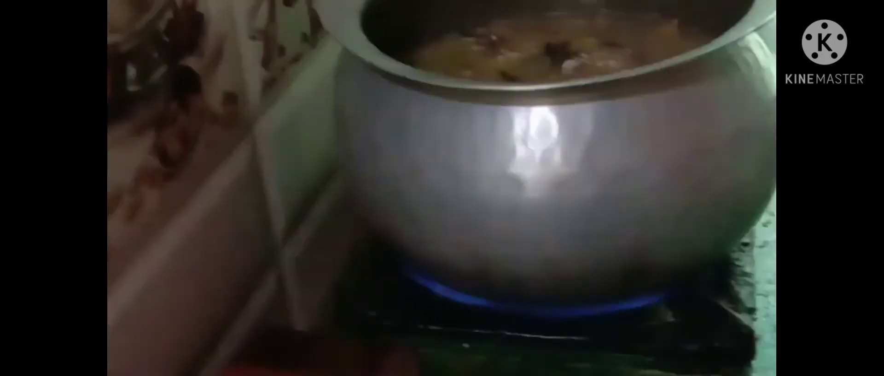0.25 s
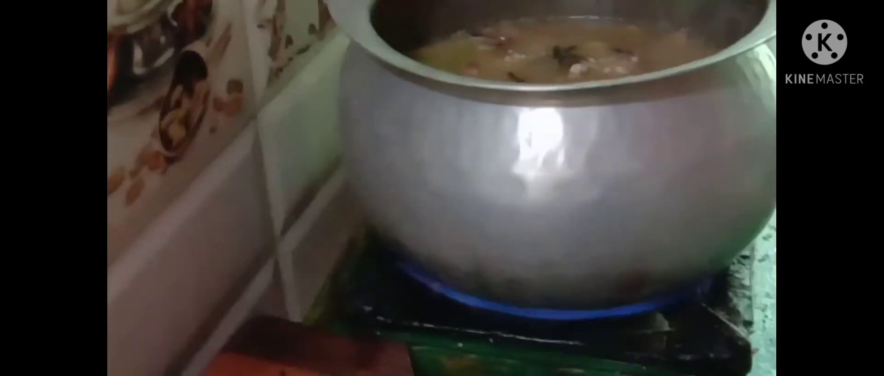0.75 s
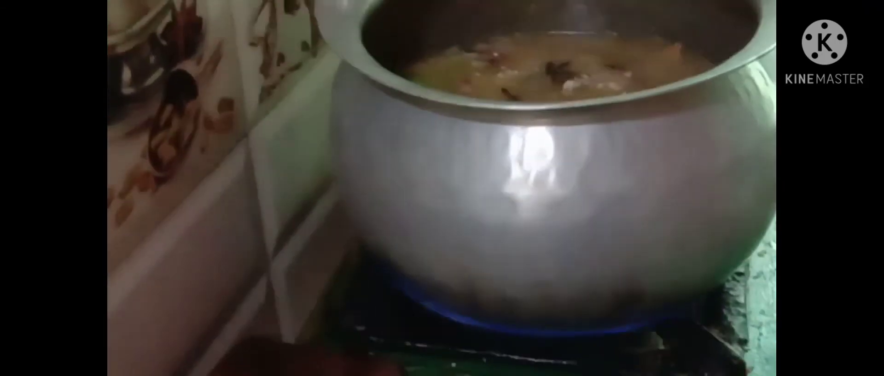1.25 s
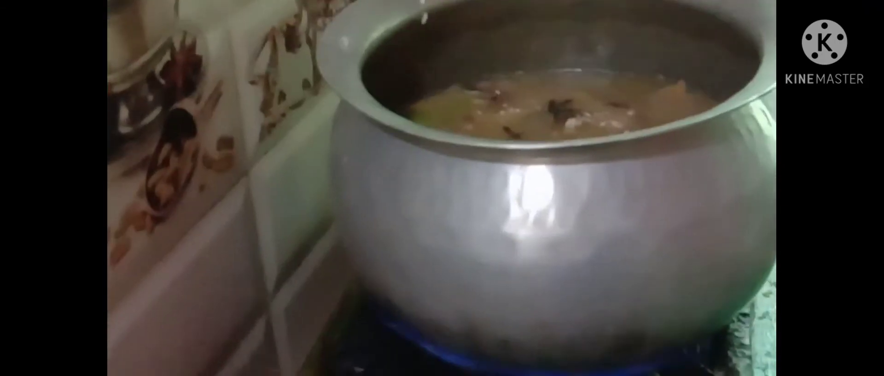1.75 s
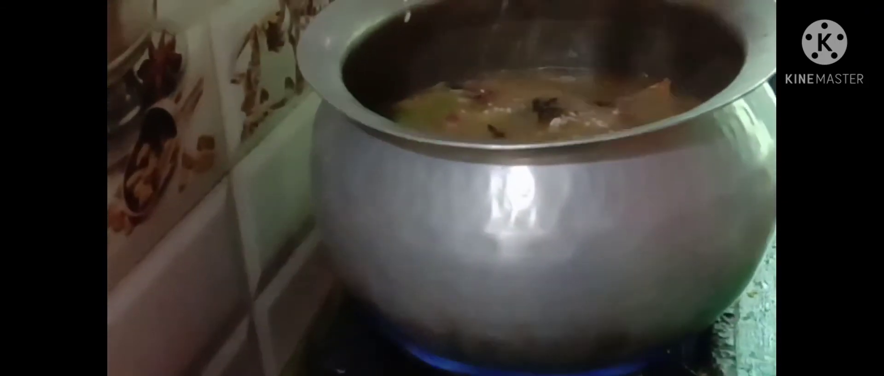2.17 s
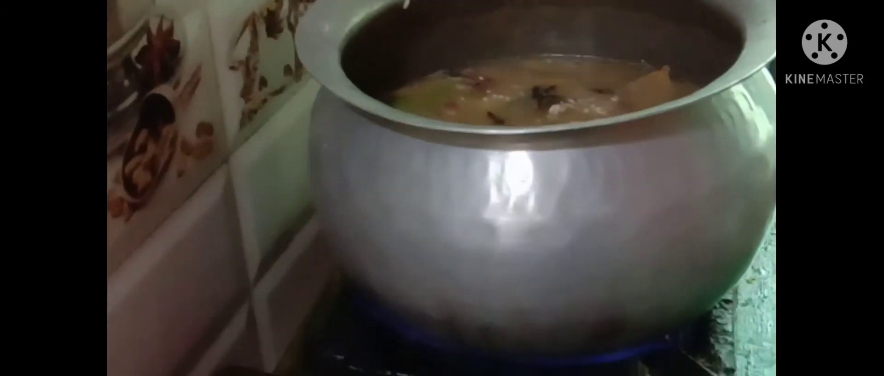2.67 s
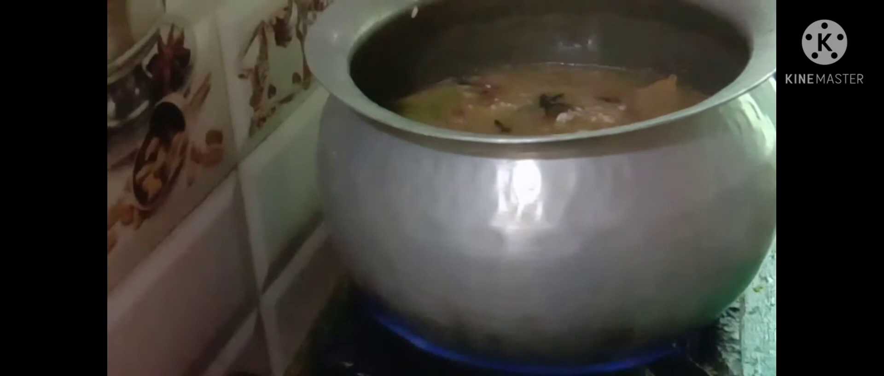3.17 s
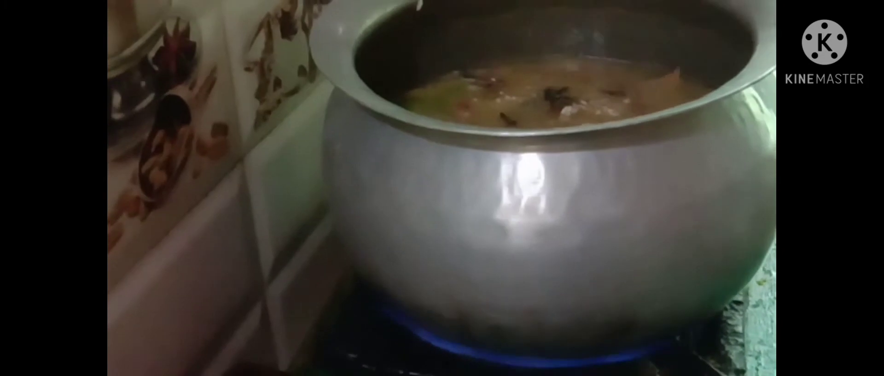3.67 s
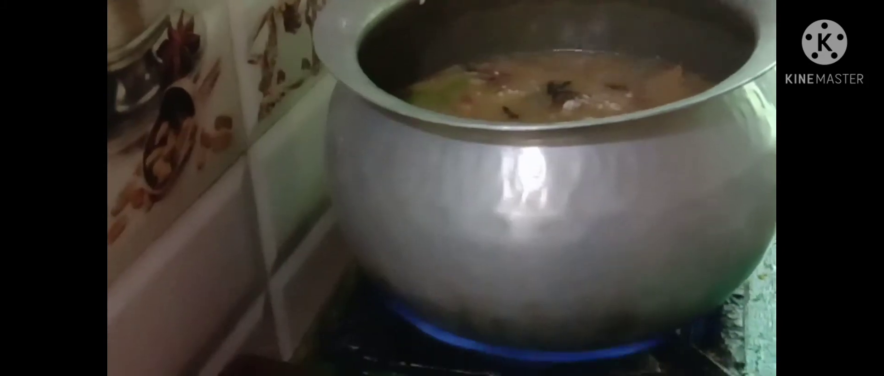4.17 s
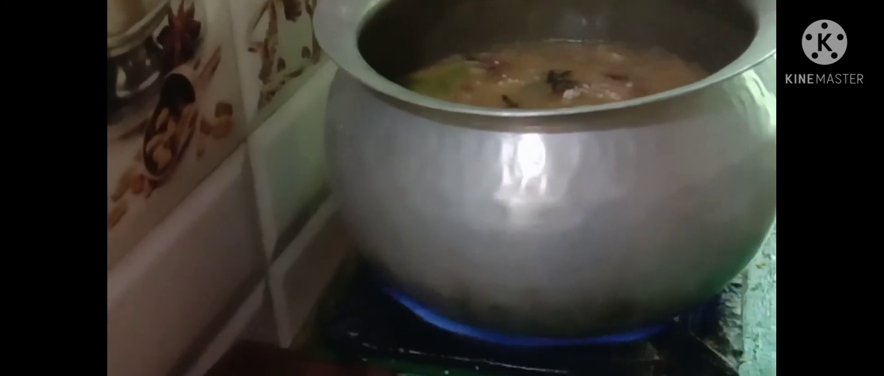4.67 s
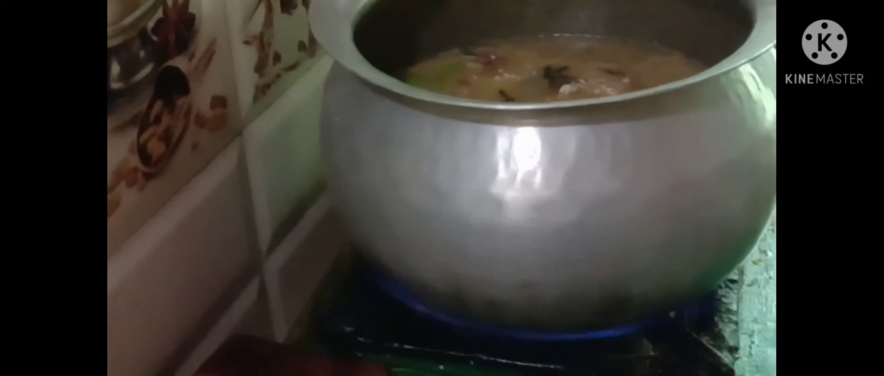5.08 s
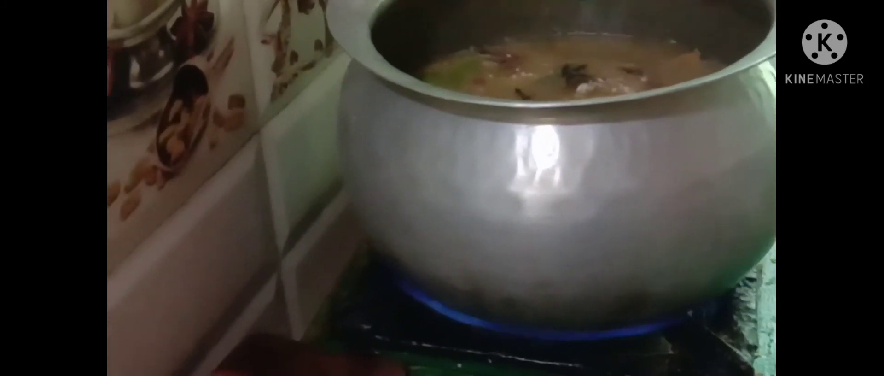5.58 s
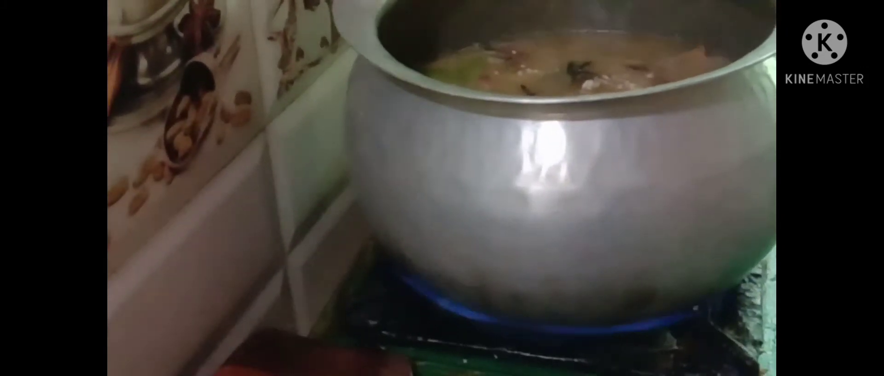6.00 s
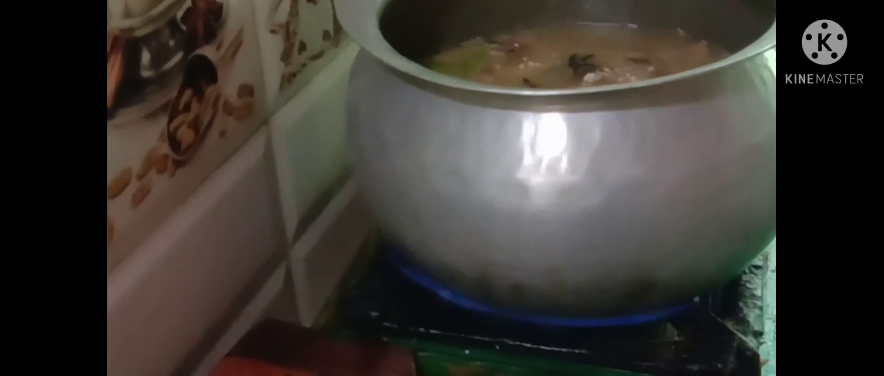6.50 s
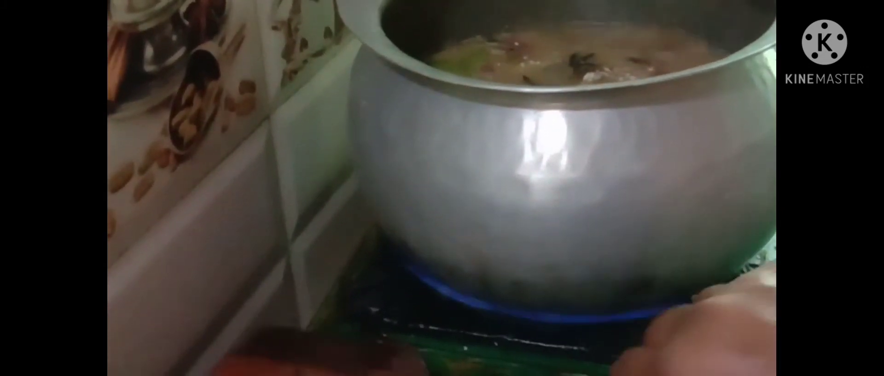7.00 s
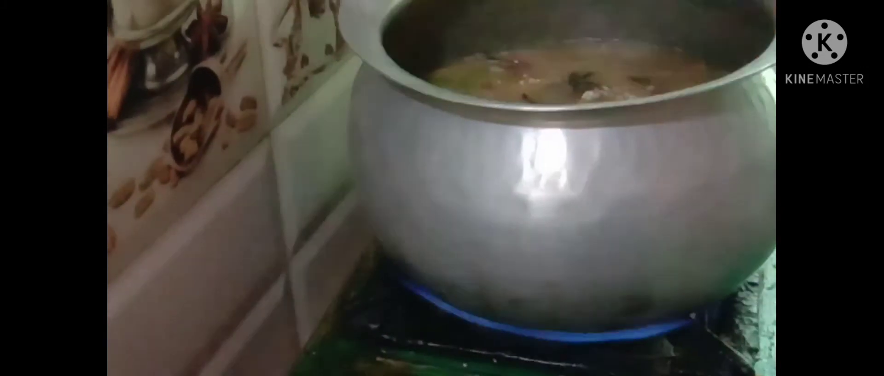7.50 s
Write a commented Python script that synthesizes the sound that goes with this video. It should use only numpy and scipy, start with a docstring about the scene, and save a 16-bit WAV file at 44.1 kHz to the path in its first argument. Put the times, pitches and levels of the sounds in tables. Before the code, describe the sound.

A steel plate knocks, rings and scrapes against a softly boiling metal pot while glass bangles jingle brightly in a small tiled kitchen.

```python
"""A big aluminium pot boils on a gas ring in a small tiled kitchen: soft pushes ring a low pot mode in even runs,
four or five thuds a second, with gurgling bubbles made of many small resonators.
A steel plate of soaked rice is knocked, scraped and dragged over metal (struck modes and friction noise) while
the cook's glass bangles jingle as thin ringing hoops. Near the end something bumps the microphone, a utensil
clinks and a wooden spoon knocks on the pot. Shaped noise makes the flame and fizz; faint chirps lie far behind."""
import sys
import numpy as np
from scipy import signal
from scipy.fft import rfft, irfft, next_fast_len
from scipy.io import wavfile

SR = 44100
rng = np.random.default_rng(int(sys.argv[2]) if len(sys.argv) > 2 else 0)


def master_out(mix):
    """Clip the mix to full scale and print it as 16-bit PCM to the path in sys.argv[1]."""
    frames = np.transpose(np.atleast_2d(mix))
    ceiling = np.clip(frames, -1, 1)
    pcm = np.round(ceiling * 32767).astype(np.int16)
    wavfile.write(sys.argv[1], SR, pcm)


N = 342200  # length in samples

# All levels in the tables are relative: each source trims its own layers.
# Even runs of heaves in the boil: first_s, last_s, period_s, first_level_db, last_level_db
HEAVE_RUNS = [(0.19, 1.775, .198, -45, -43.5), (1.993, 2.269, .276, -41, -44),
              (2.602, 4.176, .225, -41.5, -48.5), (5.324, 5.949, .21, -55, -51),
              (7.544, 7.737, .193, -49, -40.5)]
# Water welling up and gurgling: start_s, attack_s, hold_s, release_t60_s, level_db
GURGLE_SWELLS = [(0.52, 0.078, 0.033, 0.48, -45), (2.2, 0.05, 0.14, 0.85, -53.5),
                 (2.48, 0.038, 0.042, 0.47, -47), (2.72, 0.022, 0.11, 0.37, -49)]
# Colour the hollow of the pot gives to sounds in the water: frequency_hz, level_db
POT_HOLLOW_SPECTRUM = [(120, -3), (250, -3), (480, 0), (720, -9), (1000, -3), (1250, 5), (1500, -2),
                       (1900, 2), (3000, 1), (3600, -4)]

# Plate knocking against the pot: start_s, level_db, clatter_db
PLATE_KNOCKS = [(0.289, -21.5, -42), (1.026, -26, -28), (1.139, -29.5, -39), (1.249, -37, -35),
                (2.354, -47, -41.5)]
# Plate edge struck so that it rings: start_s, level_db
EDGE_PINGS = [(0.403, -24.5), (0.7701, -20.5), (1.842, -34.5), (2.033, -38.5), (2.286, -38), (2.354, -37.5),
              (2.55, -46)]
# Ringing modes of the pot and of the steel plate: frequency_hz, level_db, t60_s
POT_BODY_MODES = [(165, -8, .13), (201, -1, .24), (335, -17, .13), (425, -11, .14), (470, -9, .16),
                  (542, -1, .36), (590, -7, .2), (650, -6, .2), (760, -14, .15), (1245, -20, .25)]
STEEL_PLATE_MODES = [(1670, -14, .8), (1976, 4, .25), (2121, -14, .8), (2540, -1, .25), (2692, 1, .33),
                     (2800, 0, .2), (3305, -10, 1), (3994, 10, .2), (4600, 2, .2), (4710, 6, .24),
                     (5240, 0, .25), (5437, -17, 1), (5636, -2, .18), (6417, -5, .2), (7117, 5, .3),
                     (7317, 3, .28), (7967, 6, .16), (8926, -7, .34), (12000, -8, .3), (13130, -6, .25),
                     (14320, 0, .17)]
# Broad colour of the plate's clatter: frequency_hz, level_db
CLATTER_SPECTRUM = [(100, 0), (250, 0.5), (700, 4.5), (1200, -2.5), (2200, -2.5), (3100, 4.5), (4500, -5),
                    (7400, -3.5), (9000, -21), (15000, -23)]

# Rice swept over the plate: start_s, attack_s, hold_s, release_t60_s, rasp_db, ring_db
RICE_SWEEPS = [(0.0, 0.0017, 0.015, 0.37, -41, -39.5), (0.29, 0.0077, 0.028, 0.58, -45.5, -32),
               (0.345, 0.07, 0.1, 0.44, -31.5, -36), (1.137, 0.009, .03, 0.79, -41, -43),
               (1.245, 0.0053, 0.018, 0.35, -40.5, -45), (1.3, 0.084, 0.068, 0.26, -37, -43.5),
               (2.42, 0.025, 0.06, 0.21, -54, -55.5)]
# Plate dragged over metal in four pushes: start_s, attack_s, hold_s, release_t60_s, rasp_db, ring_db, body_db
DRAG_PUSHES = [(4.612, 0.012, 0.021, 0.46, -29, -23.5, -39.5),
               (4.705, 0.0073, 0.011, 0.36, -26.5, -43, -43),
               (4.803, 0.0089, 0.011, 0.6, -35, -42.5, -37.5),
               (4.82, 0.19, 0.072, .42, -31.5, -26.5, -35.5)]
# Resonances under friction (sweep; drag's hollow body, singing middle, bright plate): frequency_hz, width_hz, level_db
SWEEP_RESONANCES = [(209, 27, 6), (455, 89, 0), (677, 68, -2.5), (1040, 62, -11.5), (1296, 35, -3),
                    (1895, 56, -12)]
DRAG_BODY_RESONANCES = [(190, 53, -4), (451, 55, 0), (555, 35, 1), (640, 46, -3), (727, 16, 5),
                        (754, 16, 1.5)]
DRAG_SINGING_RESONANCES = [(1098, 20, 5), (1180, 67, -6), (1226, 22, 3.5), (1265, 39, 1), (1320, 50, -8)]
DRAG_PLATE_RESONANCES = [(1667, 22, 6), (1895, 45, 3), (2060, 87, -2), (2265, 28, 4), (2520, 22, 8),
                         (2649, 16, 7), (2780, 30, 1), (2890, 130, 2), (3213, 24, 4), (3460, 48, -1),
                         (5620, 88, -9), (7150, 200, -7)]
# Colour of the friction rasp, swept and dragged: frequency_hz, level_db
SWEEP_RASP_SPECTRUM = [(100, 1), (300, -10), (800, -1), (1600, -5), (2400, 0.5), (2900, 6), (4200, 0.5),
                       (6000, -1), (6600, -8), (7300, -1.5), (8600, -11.5), (13000, -24), (15000, -12)]
DRAG_RASP_SPECTRUM = [(100, -15), (450, -21), (900, -8), (1400, -4), (2700, -3.5), (4000, -3.5),
                      (5500, -3.5), (6600, -8), (7300, -1.5), (8700, -16), (11000, -21.5), (13600, -31),
                      (15000, -18)]

# Wrist moves that shake the bangles: start_s, rattle_length_s, top_partials_db, lower_partials_db, first_ring_hz
BANGLE_SHAKES = [(0.179, 0.059, -18, -41.5, 9200), (0.405, 0.012, -24, -42, 8670),
                 (0.879, .01, -30, -49, 9400), (0.921, 0.086, -20, -35.5, 9050),
                 (1.719, 0.012, -23, -48.5, 9220), (1.94, .015, -30, -49, 9100),
                 (1.961, 0.066, -16.5, -36.5, 9370), (2.034, 0.0097, -39, -38, 8200),
                 (2.2145, 0.048, -14, -34.5, 8300), (2.283, .01, -19, -34, 8620),
                 (2.549, .02, -29, -50.5, 8620), (4.2411, 0.014, -32, -48, 8840),
                 (5.386, .075, -36, -37.5, 8450), (5.547, 0.062, -20, -34.5, 8830),
                 (6.039, 0.023, -34, -47.5, 9000), (6.1, 0.0079, -26, -47, 9400),
                 (6.14, .015, -22, -43.5, 8870), (6.1897, .025, -16, -39.5, 8570),
                 (6.239, 0.014, -13, -34.5, 8690), (6.406, 0.0088, -29, -45.5, 8300),
                 (6.4884, .008, -24, -50, 8700), (6.595, 0.054, -23, -45.5, 9300),
                 (6.678, 0.01, -14, -43, 9430), (6.74, 0.012, -12, -41, 8930),
                 (6.7873, 0.0052, -17, -41.5, 9040), (6.9725, 0.0073, -19, -40, 8880),
                 (7.135, .004, -23, -52, 8750), (7.233, 0.08, -20.5, -44.5, 8810),
                 (7.315, 0.017, -21, -37.5, 8370)]
# Colour of the glass tick and of its topmost sparkle: frequency_hz, level_db
GLASS_TICK_SPECTRUM = [(500, -36), (2000, -8.5), (3600, -17), (4500, -16.5), (5600, 6), (6600, -0.5),
                       (7400, 13), (9000, 3), (10500, -4.5), (12500, 6), (14000, -25)]
GLASS_SPARKLE_SPECTRUM = [(9000, -42), (12500, -6), (13800, -119), (14500, 35), (15400, 21), (15800, -2)]

# Utensil picked up: start_s, level_db
UTENSIL_CLINKS = [(6.9612, -37), (7.0, -20), (7.002, -25)]
# Wooden spoon landing on the rim and bouncing: start_s, level_db
SPOON_KNOCKS = [(7.598, -21.5), (7.6012, -20), (7.6103, -39)]
# Bump on the microphone's housing: start_s, level_db
HOUSING_BUMPS = [(6.5317, -16)]
# Ringing modes of the utensil and of the pot's rim: frequency_hz, level_db, t60_s
STEEL_UTENSIL_MODES = [(3060, -11, .12), (3250, 8, 0.079), (3310, 2, 0.19), (3340, -10, 0.085),
                       (4480, -8, .14), (4800, -13, 0.16), (5270, -12, .13), (5700, -7, 0.15),
                       (5950, 0.5, 0.11), (6400, -9, 0.087), (6800, -12, .12), (7480, -11, 0.11),
                       (8700, -15, 0.13)]
POT_RIM_MODES = [(204, -14, 0.5), (315, -9, .12), (385, -7, 0.17), (476, 0, 0.054), (630, -14, 0.072),
                 (895, -8, 0.069), (1140, -11.5, 0.14), (1310, -7, 0.16), (1365, -2, 0.12),
                 (1650, -11, 0.055), (1893, 4, 0.16), (1948, 0.5, 0.082), (2159, -27, 0.18),
                 (2520, -23, 0.091), (2720, -24, 0.17), (3970, -41, 0.61)]
# Colour of the utensil's tick and of the bump's thud: frequency_hz, level_db
UTENSIL_TICK_SPECTRUM = [(300, -33), (2600, -9), (3200, 9), (3800, -7), (5700, 3.5), (6700, -1), (7500, -5),
                         (9500, -11), (15000, -36)]
BUMP_SPECTRUM = [(30, -44), (70, -8), (120, -0.5), (200, 3), (300, 0.5), (450, -15), (700, -33),
                 (1100, -11), (2000, -13), (2900, -12), (4500, -18), (9000, -23), (15000, -34)]

# Colour of the flame's rush and of the fizzing bubbles: frequency_hz, level_db
FLAME_SPECTRUM = [(18, -82), (30, -57), (48, -0.5), (205, 10), (270, -5.5), (393, -6.5), (489, -6.5),
                  (786, -8), (1140, -14.5), (1260, 7), (1480, -12), (1950, -18), (3400, -35), (4420, -52),
                  (7480, -120)]
FIZZ_SPECTRUM = [(2500, -4.5), (3500, -14), (4200, -10), (4600, -7.5), (5400, -5.5), (6500, -10.5),
                 (7200, -1), (7800, 4.5), (8700, -10.5), (10900, -11), (11900, -16.5), (13800, -38),
                 (14800, -3.5), (15500, -8.5)]
# Heard level of the flame's rush over time; it jumps and dips briefly after the bump and after the clinks:
# time_s, level_db
RUSH_LEVEL = [(0, 4), (6.52, 1), (6.56, 9.5), (6.7, -2), (6.98, 7), (7.12, -1), (7.15, -24), (7.4, 2),
              (7.77, 6)]
# Faint distant chirps: centre_s, length_s, pitch_hz, level_db
FAINT_CHIRPS = [(3.27, .09, 5200, -62), (3.74, .08, 4750, -60), (6.9, .06, 7300, -58)]

FLAME_DB, FIZZ_DB = -64.5, -60
CUTOFF_HZ = 15600
HEAVE_SCATTER_DB = 2.5  # from one heave to the next
BUBBLE_FULL_HZ = 400  # bubbles that ring lower than this are weaker
STROKE_RISE_DB, STROKE_BITE_S = 14, .006  # swell during the attack; fade-in of the first bite
TOUCH_GAP_S, RATTLE_FADE_DB = .018, 8  # mean time between touches; loss over the length of a rattle
STRAY_S, STRAY_TOP_DB, STRAY_LOW_DB = .06, -42.5, -54  # a faint touch comes up to this long before each shake


def boil():
    """Each heave is a soft push that swells for a few cycles in a low mode of the pot, with a watery slosh."""
    s, db = heaves()
    push = ring(clicks(s, db), hz=225, t60=.028)
    swell = ring(push, hz=204, t60=.1) * 2 * np.pi * 204 / SR
    slosh_spectrum = [(80, -3), (200, -4.5), (330, -10), (600, -14.5), (1200, -10)]
    slosh = colour(burst(s, db - 12.5, t60=0.18), slosh_spectrum)
    return kitchen(amp(-2.5) * swell + slosh, wet_db=-3)


def heaves():
    """Times and levels of the heaves: evenly spaced, growing or fading through each run, with scatter."""
    runs = []
    for first, last, period, first_db, last_db in HEAVE_RUNS:
        count = round((last - first) / period) + 1
        runs.append(np.linspace((first, first_db), (last, last_db), count))
    s, db = np.vstack(runs).T
    return s, db + HEAVE_SCATTER_DB * rng.standard_normal(len(s))


def gurgle():
    """Bubbles of many sizes burst in clusters and die away in thirty cycles; a faint bed never stops."""
    level, = strokes(GURGLE_SWELLS)
    pops = np.zeros(N)
    for hz in np.geomspace(130, 3500, 30):
        bursts = grains(per_s=60, spread_db=2) * amp(4 * drift(12))
        pops += np.sqrt(min(hz / BUBBLE_FULL_HZ, 1)) * ring(bursts, hz, 30 / hz)
    return (amp(-3) * level + amp(-66.5)) * rms_one(colour(pops, POT_HOLLOW_SPECTRUM))


def knocks():
    """The plate thumps the pot's modes and clatters briefly."""
    s, db, clatter_db = np.transpose(PLATE_KNOCKS)
    body = strike(s, db - 4, POT_BODY_MODES, scatter_db=1)
    return body + colour(burst(s, clatter_db - 2, t60=0.27), CLATTER_SPECTRUM)


def plate_pings():
    """A hard touch on the edge rings the steel plate, with a dense clank at the start."""
    s, db = np.transpose(EDGE_PINGS)
    rings = strike(s, db - 20.5, STEEL_PLATE_MODES, scatter_db=0.0)
    clank_spectrum = [(1200, -25), (2000, -4), (2700, 0), (3500, -10),
                      (4600, 1), (6500, -8), (7700, -1), (9500, -16)]
    clank = colour(burst(s, db - 12, t60=.12), clank_spectrum)
    return kitchen(rings + clank, wet_db=-12)


def sweeps():
    """Dense slips rasp on the plate; the friction also keeps one low mode singing unsteadily."""
    rasp, body = strokes(RICE_SWEEPS)
    slips = grains(per_s=3500, spread_db=3.3) * amp(1.8 * drift(60))
    hz = 544 + 10 * drift(40)
    tone = np.sqrt(2) * np.sin(2 * np.pi * np.cumsum(hz) / SR)
    note = tone * amp(1.6 * drift(40))
    hum = amp(-3.5) * note + amp(-5) * resonate(slips, SWEEP_RESONANCES)
    scrape = rms_one(kitchen(colour(slips, SWEEP_RASP_SPECTRUM), wet_db=-2.5))
    return amp(-1) * rasp * scrape + body * hum


def drag():
    """Metal grinds over metal: a rasp that rings the plate, singing middle modes and a hollow body."""
    rasp, sing, body = strokes(DRAG_PUSHES)
    slips = grains(per_s=5000, spread_db=3) * amp(1.0 * drift(70))
    scrape = rms_one(kitchen(colour(slips, DRAG_RASP_SPECTRUM), wet_db=2.5))
    grind = amp(-2.0) * rasp * scrape
    friction = rasp * slips
    plate = amp(-3.5) * np.std(friction) * resonate(friction, DRAG_PLATE_RESONANCES)
    singing = amp(-4.5) * sing * resonate(slips, DRAG_SINGING_RESONANCES)
    hollow = amp(0.5) * body * resonate(slips, DRAG_BODY_RESONANCES)
    return grind + plate + singing + hollow


def bangles():
    """One glass ring is struck with a tick; neighbours of other sizes rattle against it just after."""
    s, top_db, low_db, hz = touches()
    rings = glass(s, hz, [low_db - 3.5, low_db + 0.5, top_db - 21])
    ticks = burst(s, low_db + 0.0, t60=0.058)
    sparkle = burst(s, top_db - 9.5, t60=0.037)
    for neighbour in range(6):
        late, size, force = rng.random((len(s), 3)).T  # a larger force value makes a weaker touch
        touch = s + .016 * late
        db = low_db - 5 - 9 * force
        rings += glass(touch, 7100 + 4400 * size, [db - 2, db, db - 3])
        ticks += burst(touch, db + 5.5, t60=0.019)
        sparkle += burst(touch, top_db - 15.5 - 9 * force, t60=0.007)
    tick_noise = colour(ticks, GLASS_TICK_SPECTRUM) + colour(sparkle, GLASS_SPARKLE_SPECTRUM)
    return kitchen(rings + tick_noise, wet_db=-8.5, t60=0.37)


def touches(count=8):
    """A shake is a faint first touch, then a fading run of uneven ones: (s, top dB, low dB, Hz)."""
    rows = []
    for s, length, top_db, low_db, hz in BANGLE_SHAKES:
        jitter, size = rng.random((2, count))
        pitches = 8300 + 1800 * size
        rows.append((s - STRAY_S * jitter[0], STRAY_TOP_DB, STRAY_LOW_DB, pitches[0]))
        rows.append((s, top_db, low_db, hz))
        for k in range(1, count):
            late = TOUCH_GAP_S * (k + (jitter[k] - .5) / 2)
            loss_db = RATTLE_FADE_DB * late / length
            if late < length + TOUCH_GAP_S / 2:
                rows.append((s + late, top_db - loss_db, low_db - loss_db, pitches[k]))
    return np.transpose(rows)


def glass(s, hz, partial_db):
    """Bending modes of thin rings, with three, four and five waves round the rim; hz is the middle one."""
    waves = np.array([3, 4, 5])
    series = waves * (waves ** 2 - 1) / np.sqrt(waves ** 2 + 1)
    t, out = np.arange(SR // 8) / SR, np.zeros(N + SR)
    for ratio, levels, t60 in zip(series / series[1], partial_db, [.105, .1, .05]):
        for start, pitch, db in zip((s * SR).astype(int), hz, levels):
            partial = np.sin(2 * np.pi * pitch * ratio * t)
            out[start:start + len(t)] += amp(db - 60 * t / t60) * partial
    return out[:N]


def utensil():
    """A bright, short clink: steel modes ring under a noisy tick."""
    s, db = np.transpose(UTENSIL_CLINKS)
    rings = strike(s, db - 14.5, STEEL_UTENSIL_MODES, scatter_db=2.5)
    tick = colour(burst(s, db - 2, t60=0.035), UTENSIL_TICK_SPECTRUM)
    return kitchen(rings + tick, wet_db=-7.5)


def spoon():
    """Wood is soft: mostly the rim's lower modes answer, over a dull thock."""
    s, db = np.transpose(SPOON_KNOCKS)
    thock_spectrum = [(150, -3), (450, 3.5), (700, -6.0), (1400, -6.5),
                      (2000, 2.5), (2700, -7.5), (3500, -24), (8000, -35)]
    thock = colour(burst(s, db - 12, t60=0.077), thock_spectrum)
    return strike(s, db - 6.5, POT_RIM_MODES, scatter_db=3.5) + kitchen(thock, wet_db=-1)


def bump():
    """A dry thud, carried straight through the housing, with a short scuff."""
    s, db = np.transpose(HOUSING_BUMPS)
    thud = colour(clicks(s, db + 24.0), BUMP_SPECTRUM)
    scuff_spectrum = [(200, 14.5), (1100, 2), (2900, -8), (5000, -12), (12000, -20)]
    scuff = colour(burst(s + 0.00054, db - 13.5, t60=0.06), scuff_spectrum)
    return thud + scuff + ring(clicks(s, db - 10), hz=174, t60=0.034)


def stove():
    """The flame rushes, with a wavering hollow note under the pot; tiny bubbles fizz above."""
    rush, = gains(RUSH_LEVEL)
    flutter = amp(1.6 * drift(12))
    flame = amp(FLAME_DB) * flutter * colour(rng.standard_normal(N), FLAME_SPECTRUM)
    note = resonate(rng.standard_normal(N), [(1040, 40, -6), (1263, 55, 4), (1946, 115, -3)])
    hollow = amp(-66.5 + 3 * drift(16)) * note
    bubbles = colour(grains(per_s=10000, spread_db=2.5), FIZZ_SPECTRUM)
    fizz = amp(FIZZ_DB + 0.21 * drift(10)) * bubbles
    return rush * (flame + hollow) + fizz


def chirps():
    """Thin, breathy whistles of narrow-band noise swell and fade far in the background."""
    t, out = np.arange(N) / SR, np.zeros(N)
    for s, length, hz, db in FAINT_CHIRPS:
        swell = np.exp(-((t - s) / length) ** 2)
        out += amp(db) * swell * resonate(rng.standard_normal(N), [(hz, 450, 0)])
    return out


def kitchen(x, wet_db, t60=0.28):
    """Add the reverberation of tiled walls, arriving a few milliseconds late."""
    t = np.arange(SR // 2) / SR
    tail = rng.standard_normal(len(t)) * amp(-60 * t / t60) * (t > .004)
    return x + amp(wet_db) * signal.fftconvolve(x, tail / np.linalg.norm(tail))[:N]


def strokes(rows):
    """Each stroke bites under its peak, swells, holds and dies away; one gain over time per dB column."""
    power = 0
    for start, attack, hold, t60, *db in rows:
        t = np.arange(N) / SR - start
        swell_db = STROKE_RISE_DB * np.clip(t / attack - 1, -1, 0)
        fade_db = -60 * np.maximum(t - attack - hold, 0) / t60
        shape = np.clip(t / STROKE_BITE_S, 0, 1) * amp(swell_db + fade_db)
        power = power + np.outer(amp(db), shape) ** 2
    return np.sqrt(power)


def strike(times, db, modes, scatter_db):
    """Each blow feeds every mode with a strength of its own."""
    out = np.zeros(N)
    for k, (hz, level, t60) in enumerate(modes):
        blow_db = db + level + scatter_db * rng.standard_normal(len(db))
        out += (-1) ** k * ring(clicks(times, blow_db), hz, t60)
    return out


def burst(times, db, t60):
    """Noise that starts at each contact and dies away: modes too dense to tell apart."""
    decay = signal.lfilter([1], [1, -amp(-60 / (t60 * SR))], clicks(times, db) + 1e-18)
    return decay * rng.standard_normal(N)


def clicks(times, db):
    """One impulse for each contact."""
    out = np.zeros(N)
    out[np.clip(np.round(np.asarray(times) * SR).astype(int), 0, N - 1)] = amp(db)
    return out


def grains(per_s, spread_db):
    """Random tiny contacts of uneven size; unit power."""
    sizes = amp(spread_db * np.minimum(rng.exponential(1, N), 4)) * rng.choice([-1, 1], N)
    return rms_one(sizes * (rng.random(N) < per_s / SR))


def ring(x, hz, t60):
    """A two-pole resonator: a unit click sets a decaying sine of height 1 ringing."""
    r, w = amp(-60 / (t60 * SR)), 2 * np.pi * min(hz, SR / 2) / SR
    return signal.lfilter([0, np.sin(w)], [1, -2 * r * np.cos(w), r * r], x + 1e-18)


def resonate(x, peaks):
    """Parallel resonances of given width and height; unit power."""
    out = np.zeros(N)
    for k, (hz, width, db) in enumerate(peaks):
        t60 = np.log(1000) / (np.pi * width)
        out += (-1) ** k * amp(db) * width * ring(x, hz, t60)
    return rms_one(out)


def colour(x, spectrum):
    """Causal (minimum-phase) filter that keeps the power of white noise."""
    size = next_fast_len(N + SR // 2, True) // 2 * 2
    hz, db = np.transpose(spectrum)
    octave = np.log2(np.maximum(np.arange(size // 2 + 1) * SR / size, 1))
    beyond = np.abs(octave - np.clip(octave, np.log2(hz[0]), np.log2(hz[-1])))
    # past either end of the curve the level falls 12 dB an octave
    shape = rms_one(amp(np.interp(octave, np.log2(hz), db) - 12 * beyond))
    cepstrum = irfft(np.log(shape))
    cepstrum[1:size // 2] *= 2  # folding the cepstrum makes the phase minimal
    return irfft(rfft(x, size) * np.exp(rfft(cepstrum[:size // 2], size)))[:N]


def drift(per_s):
    """Smooth random wander between points of spread 1, per_s points a second."""
    knots = rng.standard_normal(N // 100)
    return np.interp(np.arange(N) / SR * per_s, np.arange(len(knots)), knots)


def gains(rows):
    """The dB columns of a curve as gains over time, silent outside it."""
    s, *columns = np.transpose(rows)
    return [amp(np.interp(np.arange(N) / SR, s, c, left=-120, right=-120)) for c in columns]


def rms_one(x):
    """Scale to unit power."""
    return x / np.sqrt(np.mean(x ** 2) + 1e-20)


def amp(db):
    """Decibels to gain."""
    return 10 ** (np.asarray(db) / 20)


def scene():
    """Everything at the stove, heard from close by."""
    pot = boil() + gurgle()
    plate = knocks() + plate_pings() + sweeps() + drag()
    handling = bangles() + utensil() + spoon() + bump()
    background = stove() + chirps()
    return (pot + plate + handling + background)[None]


def record(dry):
    """The small microphone loses the deep bass and rounds the highest peaks; the top is cut steeply."""
    thin = signal.sosfilt(signal.butter(2, 64, "high", fs=SR, output="sos"), dry)
    rounded = .3 * np.tanh(thin / .3)
    return signal.sosfilt(signal.ellip(10, .3, 70, CUTOFF_HZ, fs=SR, output="sos"), rounded)


dry = scene()
out = record(dry)
master_out(out)
```